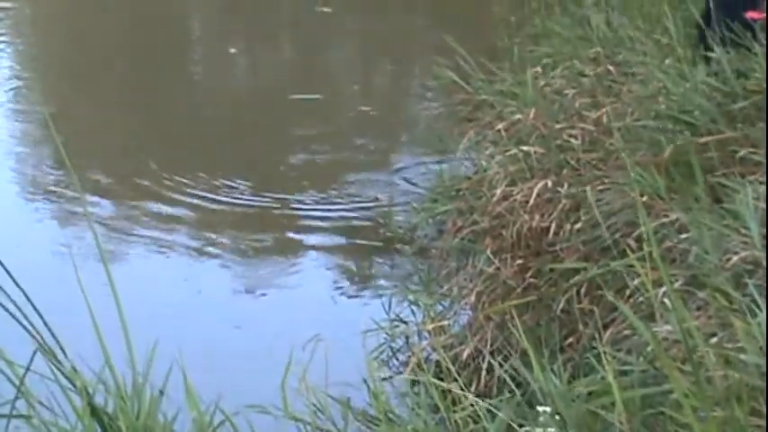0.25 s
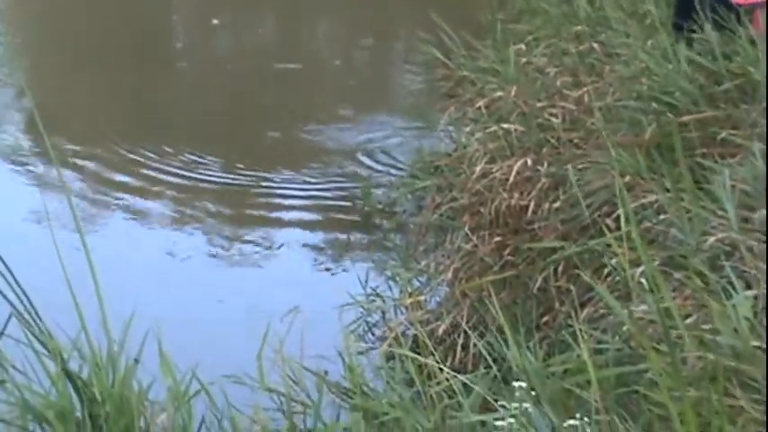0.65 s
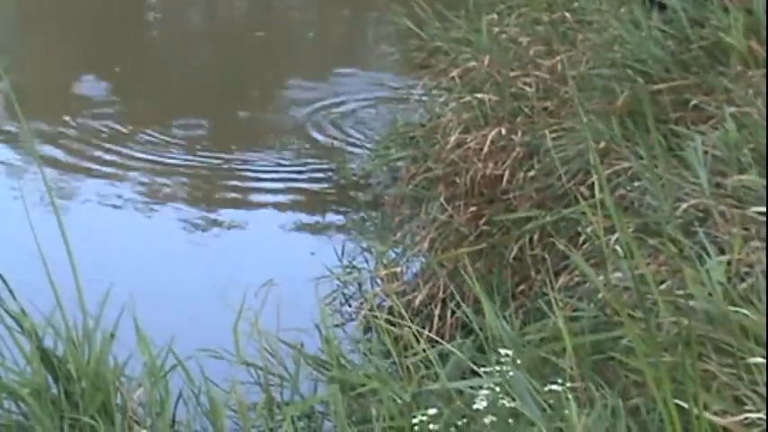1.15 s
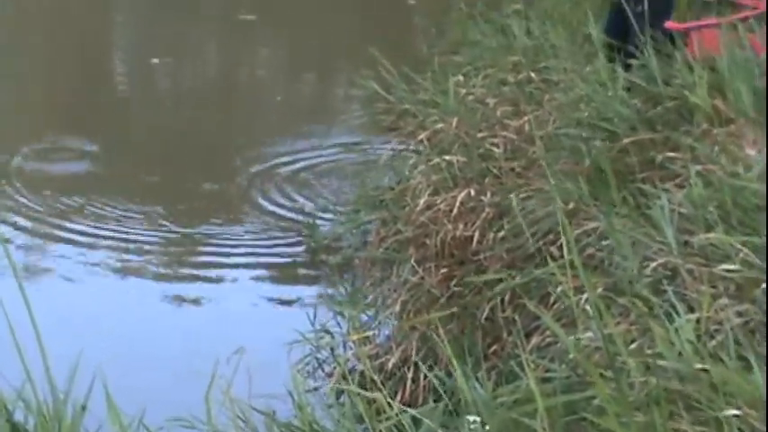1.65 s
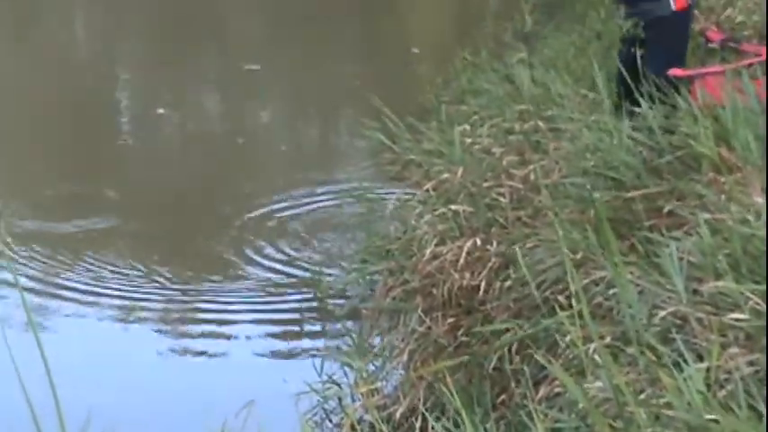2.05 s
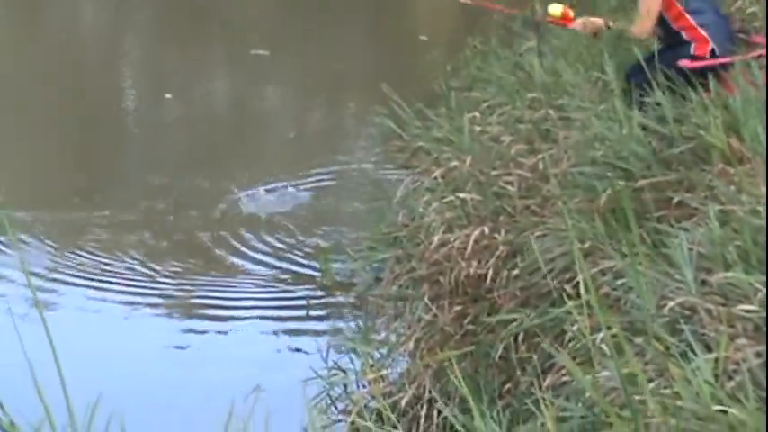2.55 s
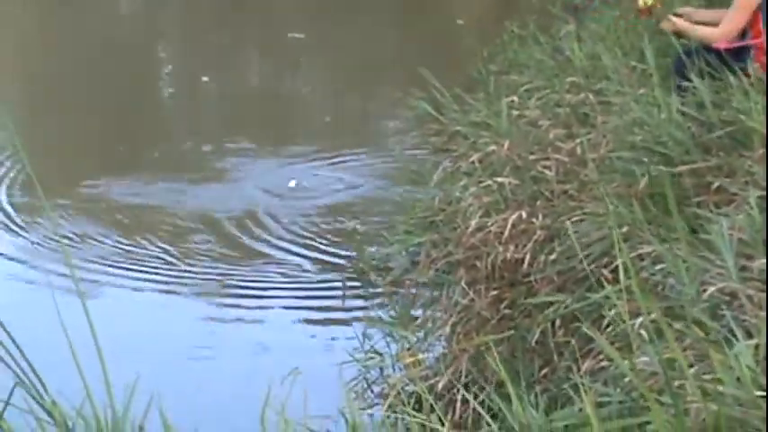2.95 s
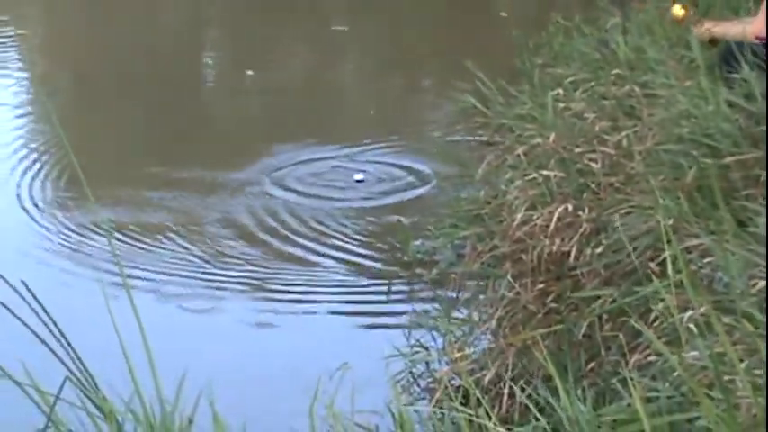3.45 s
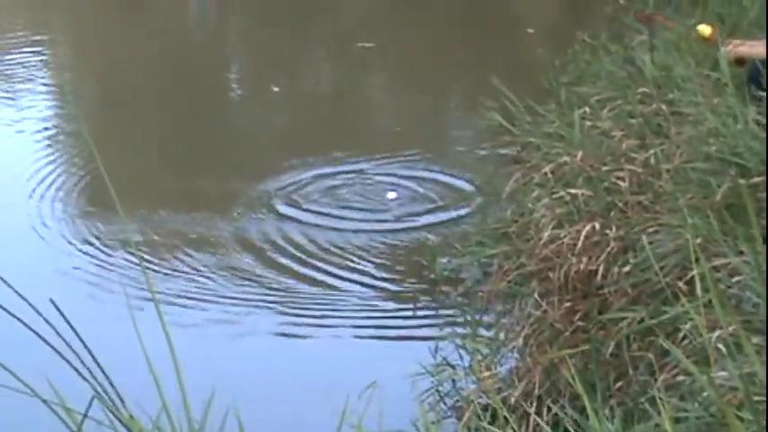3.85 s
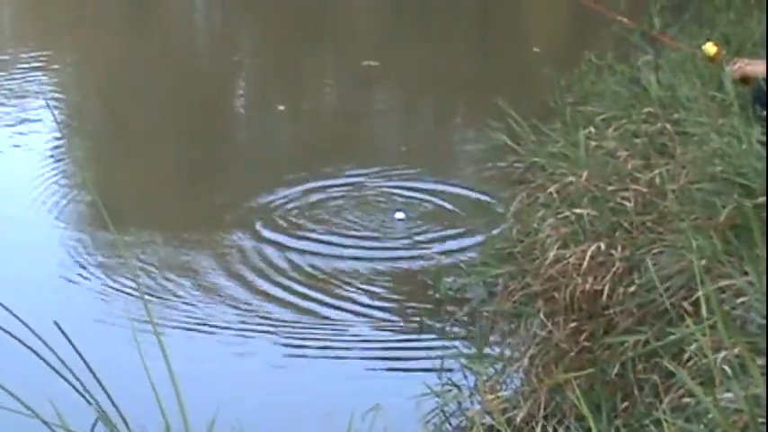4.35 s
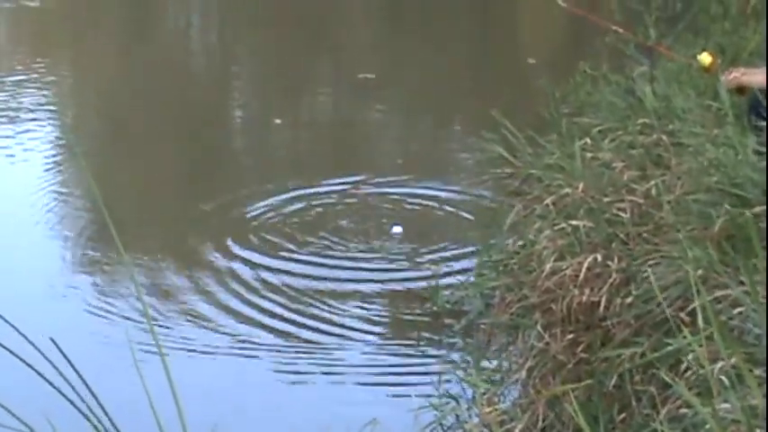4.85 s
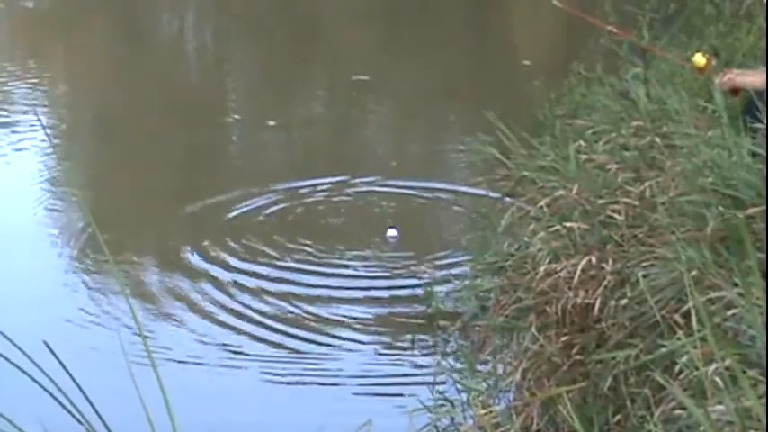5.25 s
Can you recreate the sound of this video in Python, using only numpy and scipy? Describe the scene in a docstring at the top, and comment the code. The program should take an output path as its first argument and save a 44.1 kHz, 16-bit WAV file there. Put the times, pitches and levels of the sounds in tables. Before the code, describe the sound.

High insect drone and whirring crickets outdoors, with thudding gusts of wind, one hoarse distant caw, then a small watery plop.

```python
"""An insect chorus drones near 6.7 kHz over far crickets while two bush crickets whirr: wing-stroke-gated noise.
Gusts rumble and buffet two closely spaced microphone ports: low noise, mid eddies, opposed cusps.
A crow caws once (harmonics through throat peaks); a faint whistle precedes a float's plop (gliding bubble tones
and spray noise). Dry ticks are noise bursts; behind lie a noise hush and the steady tones of a hand-held camera.
The setting is a pond bank in summer; the breeze lulls in the middle and picks up again."""
import sys
import numpy as np
from scipy import signal
from scipy.fft import rfft, irfft
from scipy.io import wavfile
from scipy.ndimage import uniform_filter1d

SR = 44100
rng = np.random.default_rng(int(sys.argv[2]) if len(sys.argv) > 2 else 0)


def put_to_file(sound):
    """Save the sound as 16-bit audio at rate SR, in the file named by the first command-line argument."""
    columns = np.atleast_2d(sound).T  # one column per channel
    safe = np.clip(columns, -1, 1)
    whole_steps = np.round(safe * 32767)
    wavfile.write(sys.argv[1], SR, whole_steps.astype(np.int16))


N = 243431
TIME = np.arange(N) / SR  # s
FREQS = np.fft.rfftfreq(N, 1 / SR)  # Hz


def undb(db):
    """Decibels to gain."""
    return 10 ** (np.asarray(db) / 20)


def unit(x):
    """Scale to rms 1."""
    return x / np.sqrt(np.mean(x ** 2))


def curves(table):
    """Each column after the time, interpolated to one value per sample."""
    time_s, *columns = np.transpose(table)
    return [np.interp(TIME, time_s, column) for column in columns]


def noise():
    """White noise."""
    return rng.standard_normal(N)


def colour(x, spectrum):
    """Shape by (freq_hz, gain_db) points on a log frequency axis; rms 1."""
    freq_hz, gain_db = np.transpose(spectrum)
    gain = undb(np.interp(np.log(FREQS + 1), np.log(freq_hz), gain_db))
    return unit(irfft(rfft(x) * gain, N))


def walk(rate_hz):
    """Smooth random curve, rms 1, changing about rate_hz times a second."""
    hold = int(SR / rate_hz / 2)
    steps = np.repeat(rng.standard_normal(N // hold + 1), hold)[:N]
    return unit(uniform_filter1d(uniform_filter1d(steps, hold), hold))


def lowpass(x, cutoff_hz):
    """Third-order low-pass."""
    return signal.sosfilt(signal.butter(3, cutoff_hz, fs=SR, output="sos"), x)


def bell(peak_s, half_s):
    """Gaussian swell to 1 at peak_s, down to 1/e half_s away."""
    return np.exp(-((TIME - peak_s) / half_s) ** 2)


def burst(peak_s, rise_s, t60_s):
    """Exponential rise to 1 at peak_s, then a 60 dB decay over t60_s."""
    before = (peak_s - TIME) / rise_s
    after = np.log(1000) * (TIME - peak_s) / t60_s
    return np.exp(-np.where(TIME < peak_s, before, after))


def ports(x, lead_ms, pan_db=0):
    """A sound from one side reaches the left port lead_ms earlier and pan_db louder."""
    late = irfft(rfft(x) * np.exp(-2j * np.pi * FREQS * lead_ms / 1000), N)
    return np.array([x * undb(pan_db / 2), late * undb(-pan_db / 2)])


def spread(mid, side):
    """Left and right from what the ports share and what differs between them."""
    return np.array([mid + side, mid - side])


def strokes(rate_hz, wander, duty):
    """Loudness of a pair of wings closing about rate_hz times a second."""
    phase = np.cumsum(rate_hz * (1 + wander * walk(2.3))) / SR + rng.random()
    return np.exp(-(np.sin(np.pi * phase) / duty) ** 2)


def chorus(spectrum, rate_hz, duty, count):
    """Many insects, each at its own stroke rate, scrape their files and ring their wings."""
    power = 0
    for _ in range(count):
        own_rate_hz = rate_hz * np.exp(.5 * rng.standard_normal())
        power = power + strokes(own_rate_hz, 0.0447, duty) ** 2
    return colour(np.sqrt(power) * noise(), spectrum)


# chorus spectra: freq_hz, gain_db (relative)
DRONE_SPECTRUM = [(5000, -62), (5700, -21), (6000, -12), (6250, -5), (6650, -1.5), (7000, -4), (7300, -10),
                  (7520, -16.5), (7750, -22), (8600, -48)]
FAR_CRICKET_SPECTRUM = [(2000, -45), (2330, -11), (2520, -4.5), (2930, 0), (3130, -9.5), (3500, -5),
                        (3900, -2), (4250, -14), (4700, -51)]


def insects():
    """Near drone and lower, farther crickets, each with a share scattered by the bank."""
    drone = ports(chorus(DRONE_SPECTRUM, 95, 1.0, count=10), lead_ms=0.0095, pan_db=1)
    drone += undb(-11.5) * spread(0, chorus(DRONE_SPECTRUM, 95, .7, count=6))
    far = ports(chorus(FAR_CRICKET_SPECTRUM, 40, 1.0, count=8), lead_ms=0.036, pan_db=0.6)
    far += undb(-11.0) * spread(0, chorus(FAR_CRICKET_SPECTRUM, 40, .6, count=6))
    return drone * undb(-39 + 0.1 * walk(9)) + far * undb(-47.5 + .5 * walk(4.8))


# whirr swelling and easing off: time_s, level_db (before WHIRR_GAIN_DB)
WHIRR_LEVEL = [(0, -48), (.3, -49), (.7, -54), (1.1, -50.5), (2.25, -48), (2.45, -51), (3.2, -51),
               (3.8, -48), (4.3, -47), (4.7, -52.5), (5.52, -51)]
# wing resonance: freq_hz, gain_db (relative)
WING_SPECTRUM = [(7000, -36), (9000, -15), (10300, -7), (11200, -1.5), (12300, 0), (13200, -6),
                 (14400, -14), (15400, -28)]
WHIRR_GAIN_DB = 4.5


def bush_crickets():
    """Two buzzers off to one side; stroke-gated noise drifts in and out of step."""
    level_db, = curves(WHIRR_LEVEL)
    first = noise() * strokes(38.5, 0.032, 0.88) * undb(1.2 * walk(11))
    second = noise() * strokes(33.0, 0.0305, 0.68) * undb(1.0 * walk(22) + 4.5)
    whirr = colour(first + second, WING_SPECTRUM)
    return ports(whirr, lead_ms=0.036, pan_db=1.3) * undb(level_db + WHIRR_GAIN_DB)


# breeze with a lull in the middle: time_s, rumble_db
BREEZE_LEVEL = [(0, -37.5), (.35, -33.5), (.75, -33.5), (1.03, -33.5), (1.22, -28), (1.7, -33.5),
                (2.05, -32.5), (2.5, -45), (2.9, -40.5), (3.3, -42), (3.55, -47), (4.05, -31.5), (4.4, -35),
                (4.85, -28.5), (5.25, -38), (5.52, -37.5)]
# gusts on top of it: peak_s, rumble_db, half_s, pan_db (left minus right)
GUST_EVENTS = [(0.259, -29.5, 0.016, 2), (0.436, -25, 0.026, 0.5), (.575, -20, 0.033, 1.5),
               (0.696, -22, 0.013, 2.5), (0.799, -24.5, 0.051, -0.5), (1.517, -30, 0.017, -5),
               (1.99, -37.5, 0.055, -1), (4.008, -31, 0.013, -1), (4.748, -21, 0.019, -3.5),
               (4.933, -21, 0.044, -2), (5.466, -31, 0.023, 5)]
# wind spectra, rumble shared and differing, then eddies: freq_hz, gain_db (relative)
RUMBLE_SPECTRUM = [(10, -29), (25, 3), (45, -0.5), (90, -5), (140, -14), (250, -32), (600, -77)]
RUMBLE_SIDE_SPECTRUM = [(10, -20), (30, 4), (60, 9), (100, 7), (150, -3), (300, -40)]
EDDY_SPECTRUM = [(40, -45), (100, 12), (170, 5.5), (280, -4), (450, -16), (800, -28.5), (1600, -54),
                 (4000, -68)]
BREEZE_PAN_DB = -1  # left minus right
GUST_DB = -26  # reference rumble
EDDY_DB, EDDY_GROWTH = -27.5, 1.57  # eddies at GUST_DB; dB per dB of rumble


def wind(shared_db=-7.5, shared_growth=0.15, top_hz=1800):
    """Rumble on both ports; small eddies grow faster and push the ports against each other."""
    breeze = undb(curves(BREEZE_LEVEL)[0]) ** 2
    gusts = [(undb(db) ** 2 * bell(s, half_s), pan_db) for s, db, half_s, pan_db in GUST_EVENTS]
    power = breeze + sum(gust for gust, _ in gusts)
    pan_db = (breeze * BREEZE_PAN_DB + sum(gust * pan for gust, pan in gusts)) / power
    force_db = 10 * np.log10(power) - GUST_DB

    rumble_side = undb(-8) * colour(noise(), RUMBLE_SIDE_SPECTRUM)
    rumble = spread(colour(noise(), RUMBLE_SPECTRUM), rumble_side) * undb(1.6 * walk(10))

    flutter = undb(3.0 * walk(54) + 1.6 * walk(13))
    # a strong gust has larger eddies, which cover both ports at once
    shared = undb(shared_db + shared_growth * force_db) * colour(noise() * flutter, EDDY_SPECTRUM)
    eddies = spread(shared, colour(noise() * flutter, EDDY_SPECTRUM))
    eddies = lowpass(eddies * undb(EDDY_DB + EDDY_GROWTH * force_db), top_hz)
    return (rumble * np.sqrt(power) + eddies) * undb(np.array([pan_db, -pan_db]) / 2)


# hardest buffets: cusp_s, cusp_db (before filtering), pan_db (left minus right)
BUFFET_EVENTS = [(0.419, -16.5, -2), (.461, -10, -9.5), (.551, -3, 5), (.573, -10, 9), (.593, -8, 3),
                 (4.744, -8, -7), (4.925, -10, -5), (.691, -13, 18.5), (.745, -11.5, 13.5),
                 (.787, -20, -10), (1.513, -17, -8), (4.969, -10.5, -1)]
BUFFET_RISE_S = 0.0012


def buffets(fall=.6, rebound=3.5, soft_hz=1400, swell=3.5, swell_db=-9):
    """A vortex hits: a broad swell on both ports and a rebounding cusp, opposite left and right."""
    out = np.zeros((2, N))
    for cusp_s, cusp_db, pan_db in BUFFET_EVENTS:
        near = abs(TIME - cusp_s) < .1
        t = (TIME[near] - cusp_s) / BUFFET_RISE_S  # in rise times, as are fall and swell
        away = np.where(t < 0, -t, t / fall)
        cusp = (np.exp(-away) - np.exp(-away / rebound) / rebound) / (1 - 1 / rebound)
        push = -2 * t / swell * np.exp(-(t / swell) ** 2)
        port_db = cusp_db + np.array([[pan_db], [-pan_db]]) / 2
        out[:, near] += spread(undb(swell_db) * push, cusp) * undb(port_db)
    # only the large, slow part of a vortex covers both ports
    slow = signal.butter(1, 450, fs=SR, output="sos")
    shared = signal.sosfiltfilt(slow, (out[0] + out[1]) / 2)
    return lowpass(spread(shared, (out[0] - out[1]) / 2), soft_hz)


# throat resonances: centre_hz, width_hz, gain_db
THROAT_PEAKS = [(1340, 190, 0), (1900, 280, -5.5), (2500, 320, -5), (3400, 700, -8), (4220, 480, -1.5),
                (4950, 650, -7)]
# hoarse rise, clear hold, sagging fall
CAW_S, CAW_RISE_S, CAW_HOLD_S, CAW_FALL_S = 1.295, .09, .072, .2
CAW_HZ, CLIMB_HZ_PER_S, SAG_HZ_PER_S = 269, 540, 320
CAW_DB, SWELL_DB_PER_S, FADE_DB_PER_S = -41, 93, 53
ROUGH_START, ROUGH_HOLD, ROUGH_END = 1.2, .15, .55
# treble edge; moment and half length of the widest gape
BEAK_OPEN_HZ, BEAK_SHUT_HZ, BEAK_OPEN_S, BEAK_HALF_S = 5500, 4070, 1.368, 0.1


def crow(jitter=.012, rasp=.8, lag_rad=.7, echo_db=-16, echo_t60_s=.45, edge_s=.025):
    """Syrinx harmonics ring the throat; the opening beak passes more treble; the banks answer faintly."""
    top_s, release_s, end_s = CAW_S + np.cumsum([CAW_RISE_S, CAW_HOLD_S, CAW_FALL_S])
    early_s = np.clip(top_s - TIME, 0, CAW_RISE_S)
    late_s = np.clip(TIME - release_s, 0, CAW_FALL_S)
    pitch_hz = CAW_HZ - CLIMB_HZ_PER_S * early_s - SAG_HZ_PER_S * late_s
    rough = np.interp(TIME, [CAW_S, top_s, release_s, end_s],
                      [ROUGH_START, ROUGH_HOLD, ROUGH_HOLD, ROUGH_END])
    edge_hz = BEAK_SHUT_HZ + (BEAK_OPEN_HZ - BEAK_SHUT_HZ) * bell(BEAK_OPEN_S, BEAK_HALF_S)
    gate = np.clip(np.minimum(TIME - CAW_S, end_s - TIME) / edge_s, 0, 1)
    live = gate > 0
    cycles = np.cumsum(pitch_hz * (1 + jitter * rough * walk(116.6))) / SR
    port_phase = np.array([[0], [-lag_rad]])  # the bird sits to the left

    call = np.zeros((2, N))
    for k in range(2, 24):
        partial_hz = k * pitch_hz[live]
        throat_power = sum(undb(2 * gain_db) / (1 + ((partial_hz - centre_hz) / width_hz) ** 2 * 2) ** 2
                           for centre_hz, width_hz, gain_db in THROAT_PEAKS)
        beak = 1 / (1 + (partial_hz / edge_hz[live]) ** 18)
        flutter = 1 + rasp * rough[live] * walk(170)[live]
        phase = 2 * np.pi * k * cycles[live] + rng.uniform(0, np.pi / 2) + port_phase
        call[:, live] += np.sqrt(throat_power) * beak * flutter * np.sin(phase)
    call *= gate * undb(CAW_DB - SWELL_DB_PER_S * early_s - FADE_DB_PER_S * late_s)

    tails = rng.standard_normal((2, SR)) * np.exp(-np.log(1000) * TIME[:SR] / echo_t60_s)
    tails /= np.linalg.norm(tails, axis=1, keepdims=True)
    return call + undb(echo_db) * signal.fftconvolve(call, tails, axes=1)[:, :N]


# faint rising whistle before the plop: time_s, pitch_hz, level_db
WHISTLE_CURVE = [(2.51, 1383, -62), (2.535, 1720, -53), (2.56, 1830, -44), (2.585, 1880, -57)]


def whistle():
    """The cast line sings faintly as it runs out: one gliding sine."""
    pitch_hz, level_db = curves(WHISTLE_CURVE)
    live = (TIME > WHISTLE_CURVE[0][0]) & (TIME < WHISTLE_CURVE[-1][0])
    return live * undb(level_db) * np.sin(2 * np.pi * np.cumsum(pitch_hz) / SR)


# float bubbles and small plips: start_s, start_pitch_hz, level_db (before PLOP_GAIN_DB), t60_s
BUBBLE_EVENTS = [(2.584, 1210, -30.5, 0.018), (2.597, 695, -29.5, 0.032), (2.6, 1730, -25, 0.021),
                 (2.602, 1020, -38.5, 0.047), (2.601, 386, -35, 0.1), (2.603, 675, -36.5, 0.07),
                 (2.626, 1800, -42, 0.029), (2.91, 533, -38, 0.03), (2.912, 1300, -42.5, 0.028),
                 (2.983, 935, -41, 0.029), (2.984, 1850, -35.5, 0.031), (3.074, 2000, -44, .025)]
PLOP_GAIN_DB = 1.5


def plops(glide=0.18, attack_s=0.00021):
    """Trapped air rings and rises in pitch as it nears the surface."""
    out = np.zeros(N)
    for start_s, pitch_hz, level_db, t60_s in BUBBLE_EVENTS:
        live = (TIME >= start_s) & (TIME < start_s + t60_s)
        t = TIME[live] - start_s
        ring = np.sin(2 * np.pi * pitch_hz * t * (1 + glide * t / t60_s / 2))
        envelope = (1 - np.exp(-t / attack_s)) * np.exp(-np.log(1000) * t / t60_s)
        out[live] += undb(level_db) * ring * envelope
    return ports(out, lead_ms=0.069, pan_db=1.0) * undb(PLOP_GAIN_DB)


# spray: freq_hz, gain_db (relative)
SPRAY_SPECTRUM = [(200, -19), (400, 2), (1000, -4), (1900, 2), (2400, -14), (4000, -12), (10000, -23)]
SPLASH_S = 2.6015


def splash(rise_s=0.0064, t60_s=0.097, level_db=-38):
    """The float slaps the surface and throws a little spray: one noise burst."""
    spray = spread(colour(noise(), SPRAY_SPECTRUM), undb(-4) * colour(noise(), SPRAY_SPECTRUM))
    return spray * burst(SPLASH_S, rise_s, t60_s) * undb(level_db)


# tackle and grass ticks: peak_s, level_db (before TICK_GAIN_DB), rise_s, t60_s
TICK_EVENTS = [(.17, -36, .015, 0.13), (.300, -34, .006, .08), (.442, -33.5, .003, .1),
               (0.646, -41, .003, .05), (.930, -34, 0.0043, .08), (1.106, -33, .002, .037),
               (2.536, -23.5, .0003, 0.024), (2.56, -35, 0.01, .08), (3.285, -35, .003, .05),
               (3.969, -35, .002, .03), (4.335, -36, .015, 0.1)]
# tick colour: freq_hz, gain_db (relative)
TICK_SPECTRUM = [(300, -35), (1500, -18), (3500, -2), (6000, -2), (8000, -4), (9500, 2), (11000, -5),
                 (15500, -9)]
TICK_GAIN_DB = -5


def ticks():
    """Dry snaps from line, reel and stalks, each dying away as a short rustle."""
    envelope = sum(undb(level_db) * burst(peak_s, rise_s, t60_s)
                   for peak_s, level_db, rise_s, t60_s in TICK_EVENTS)
    return ports(colour(noise(), TICK_SPECTRUM) * envelope, lead_ms=0.011) * undb(TICK_GAIN_DB)


# hush, shared and differing between ports: freq_hz, gain_db (relative)
AIR_MID_SPECTRUM = [(20, 9), (100, 2.5), (250, 2.5), (600, 2.5), (1200, -3), (2100, -3.5), (4400, -1),
                    (5400, 0.5), (8300, -5.5), (9700, -1), (11500, -6), (13300, -12.5), (15700, -7)]
AIR_SIDE_SPECTRUM = [(20, -5), (250, -2), (600, 2.5), (1200, -2), (2100, -5.5), (5400, -8.5), (8300, -22),
                     (15000, -24)]


def air():
    """The even hush of leaves and open country: slightly wavering coloured noise."""
    mid = colour(noise() * undb(0.92 * walk(9)), AIR_MID_SPECTRUM)
    side = colour(noise() * undb(0.72 * walk(9)), AIR_SIDE_SPECTRUM)
    return spread(undb(-45.0) * mid, undb(-52.0) * side)


# camera whine: freq_hz, rms_db
WHINE_TONES = [(12291, -70), (13296, -76), (14301, -82)]


def whine():
    """Thin steady sines from the camera itself."""
    return sum(np.sqrt(2) * undb(rms_db) * np.sin(2 * np.pi * freq_hz * TIME)
               for freq_hz, rms_db in WHINE_TONES)


def scene():
    """Everything at the bank, left and right."""
    chorus_and_wind = insects() + bush_crickets() + wind() + buffets()
    events = crow() + whistle() + plops() + splash() + ticks()
    return chorus_and_wind + events + air() + whine()


TOP_HZ = 15800


def record(dry):
    """The camera drops the deepest rumble, clips at full scale and cuts the top."""
    x = signal.sosfilt(signal.butter(1, 14, "high", fs=SR, output="sos"), dry)
    return irfft(rfft(np.clip(x, -1, 1)) * (FREQS < TOP_HZ), N)


dry = scene()
out = record(dry)
put_to_file(out)
```